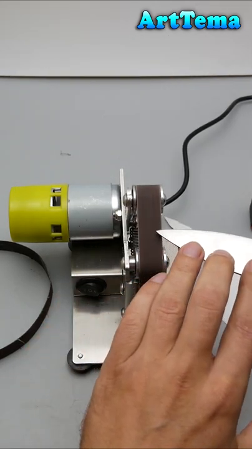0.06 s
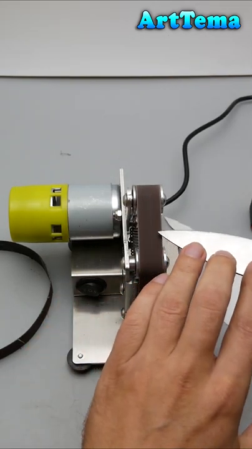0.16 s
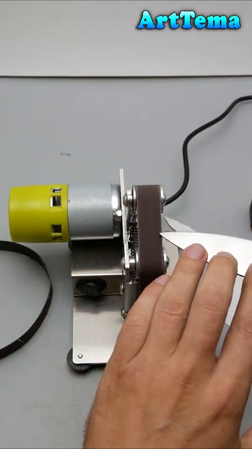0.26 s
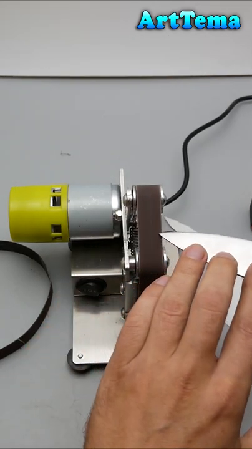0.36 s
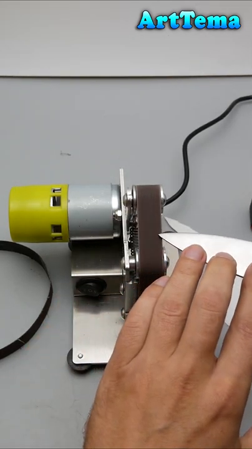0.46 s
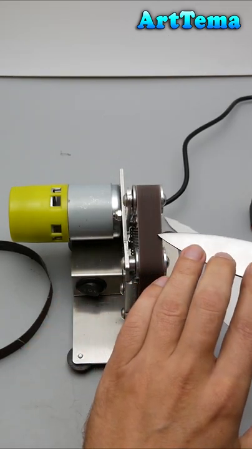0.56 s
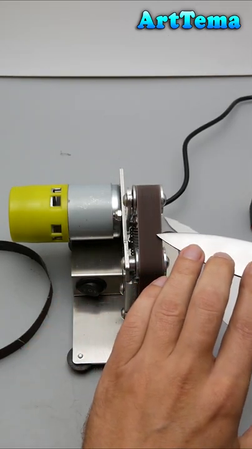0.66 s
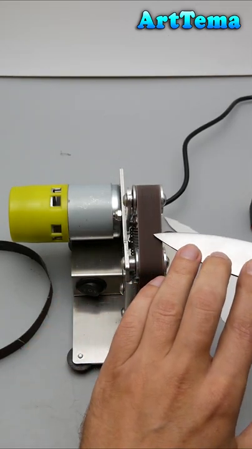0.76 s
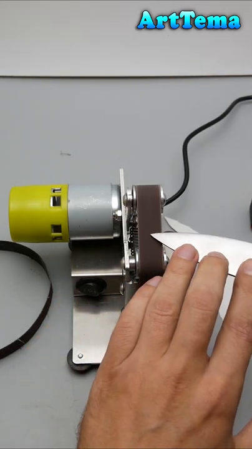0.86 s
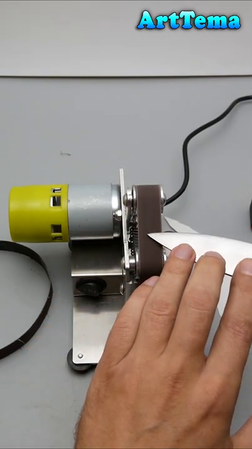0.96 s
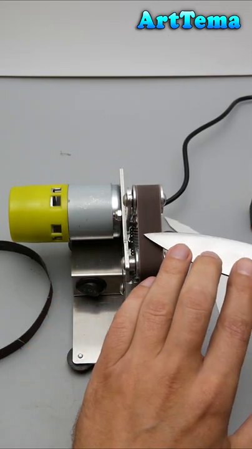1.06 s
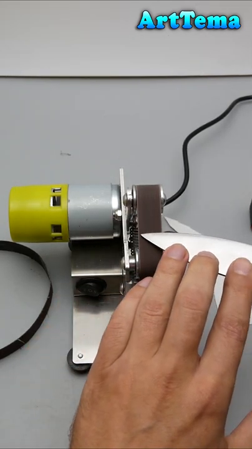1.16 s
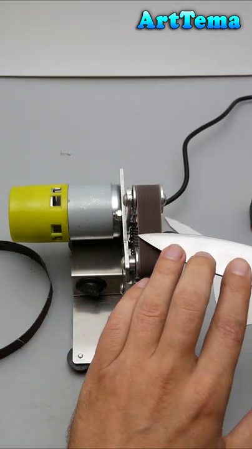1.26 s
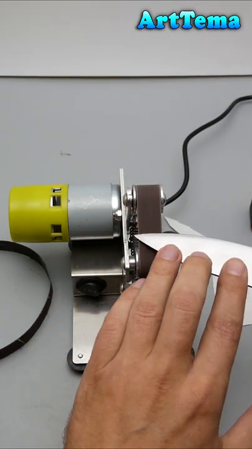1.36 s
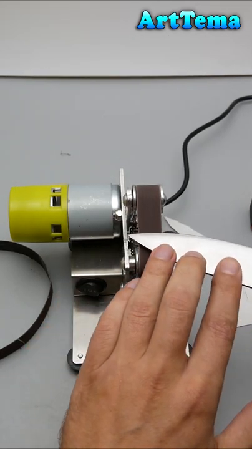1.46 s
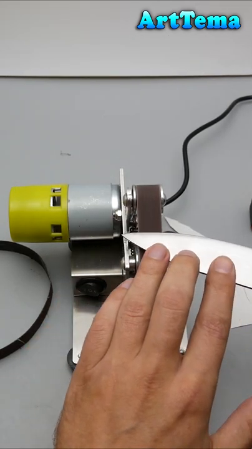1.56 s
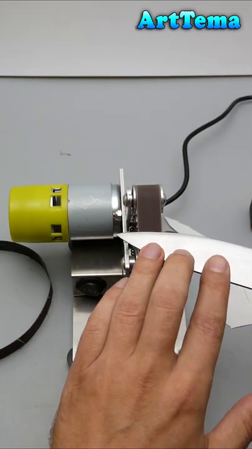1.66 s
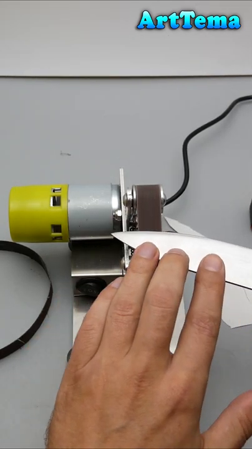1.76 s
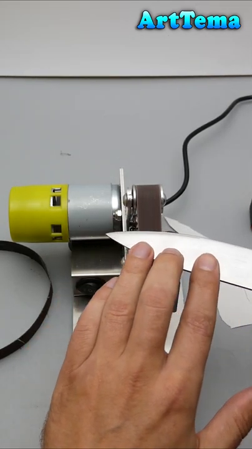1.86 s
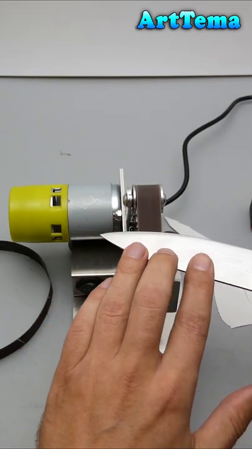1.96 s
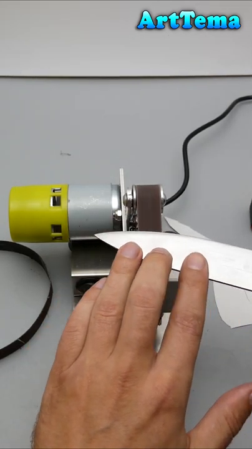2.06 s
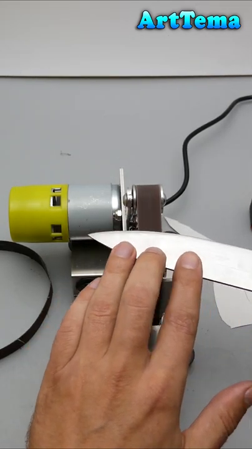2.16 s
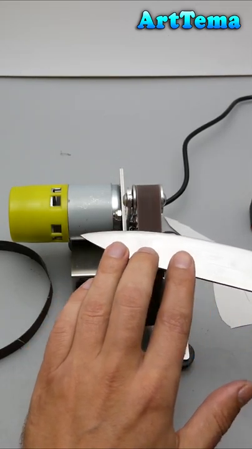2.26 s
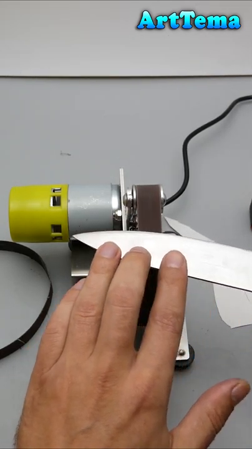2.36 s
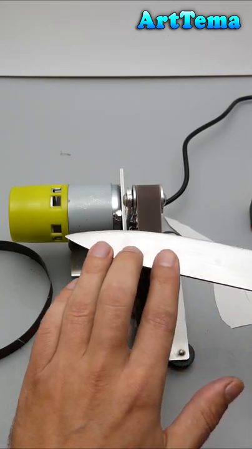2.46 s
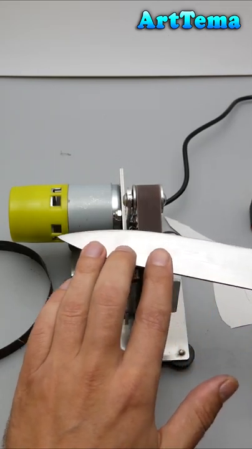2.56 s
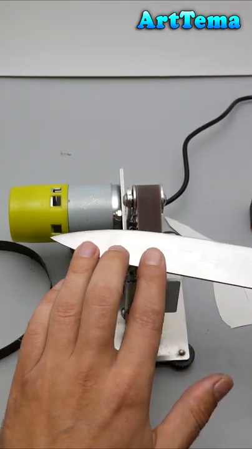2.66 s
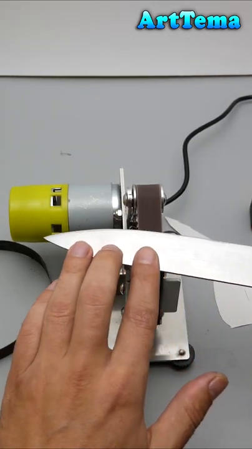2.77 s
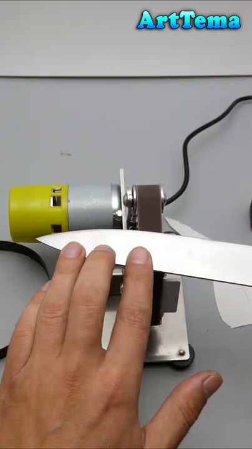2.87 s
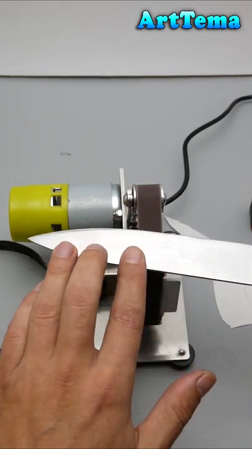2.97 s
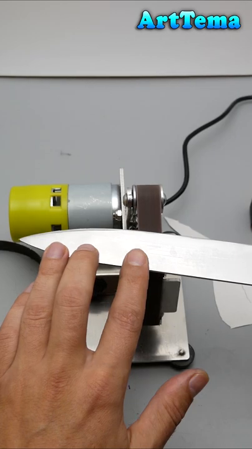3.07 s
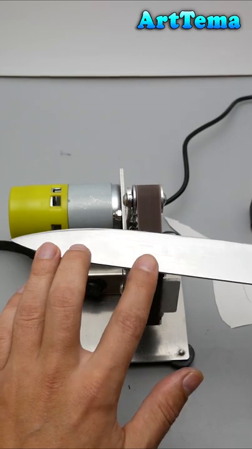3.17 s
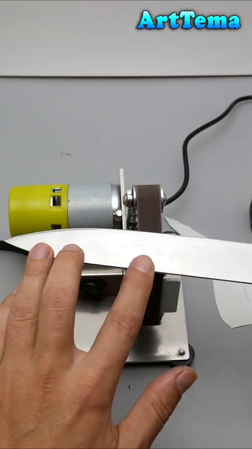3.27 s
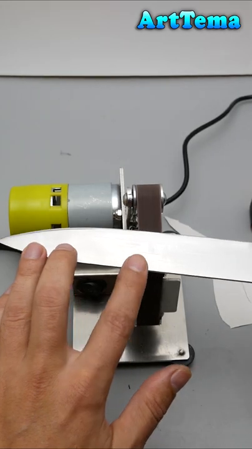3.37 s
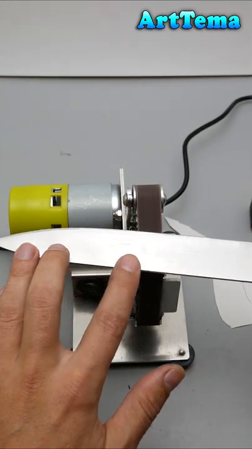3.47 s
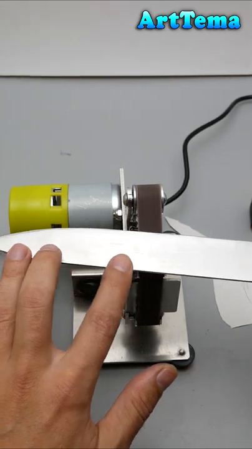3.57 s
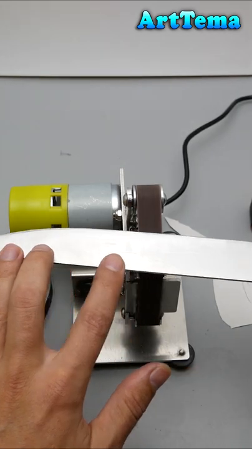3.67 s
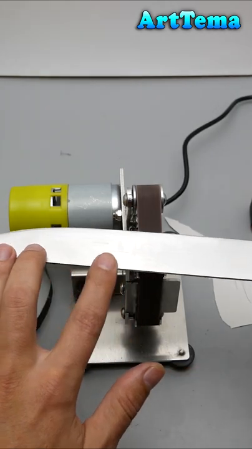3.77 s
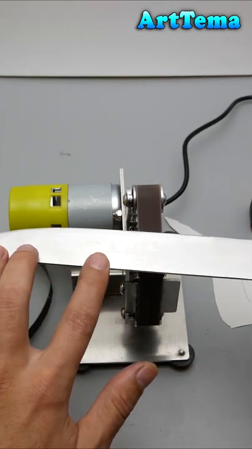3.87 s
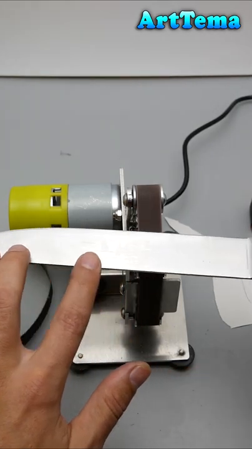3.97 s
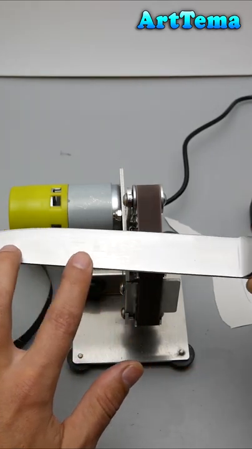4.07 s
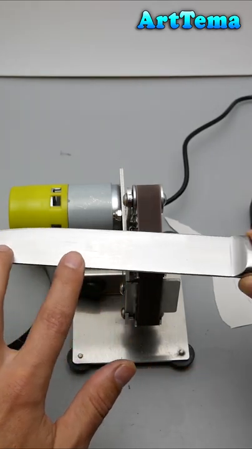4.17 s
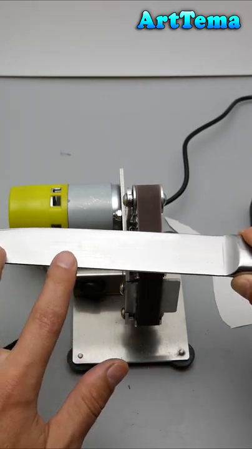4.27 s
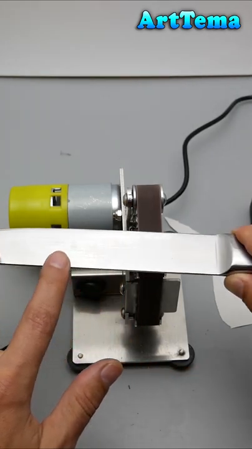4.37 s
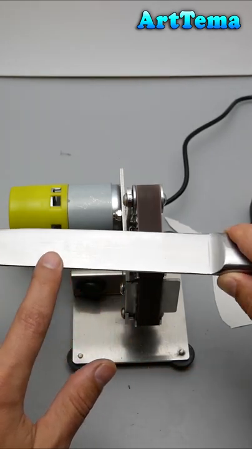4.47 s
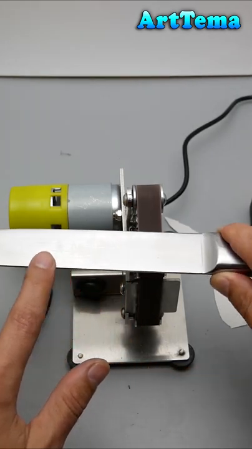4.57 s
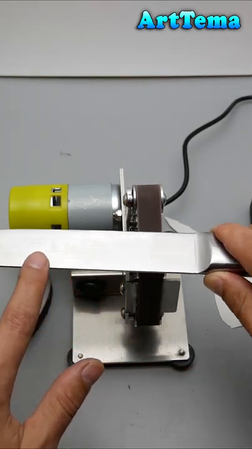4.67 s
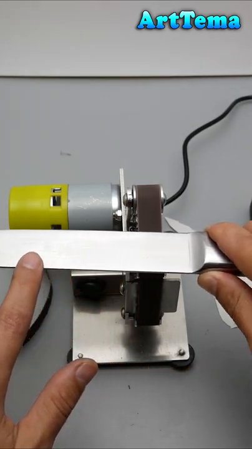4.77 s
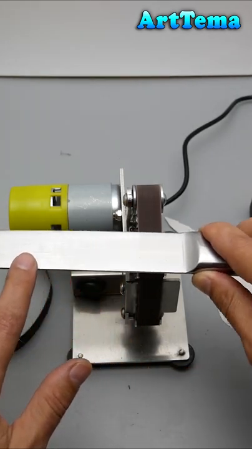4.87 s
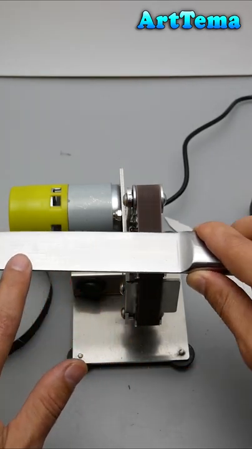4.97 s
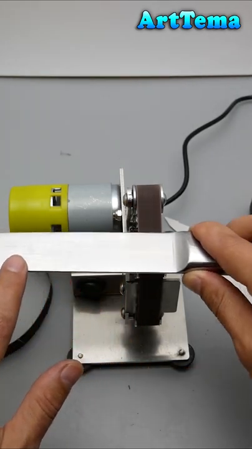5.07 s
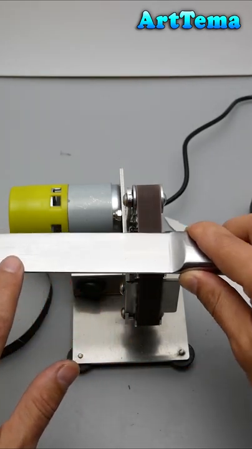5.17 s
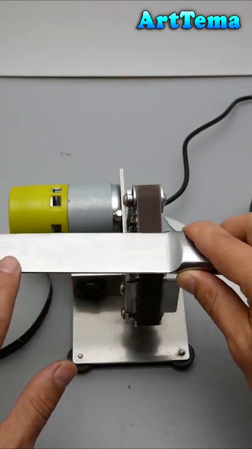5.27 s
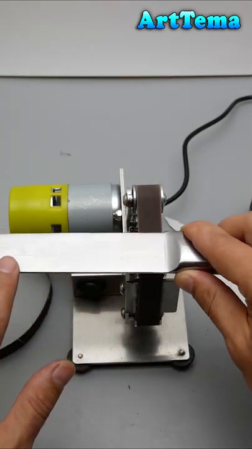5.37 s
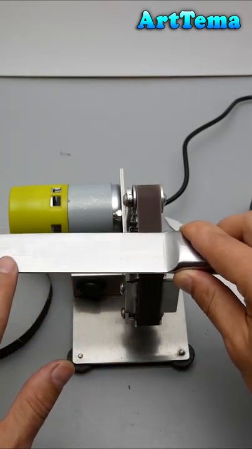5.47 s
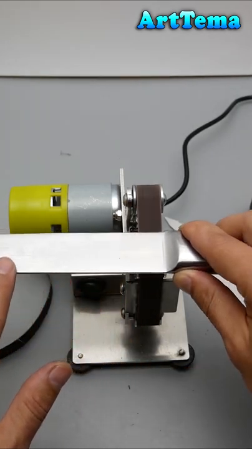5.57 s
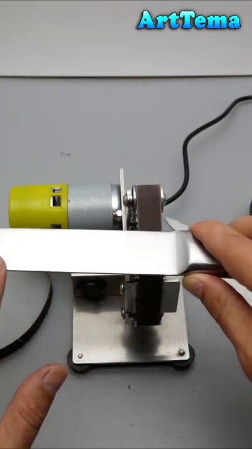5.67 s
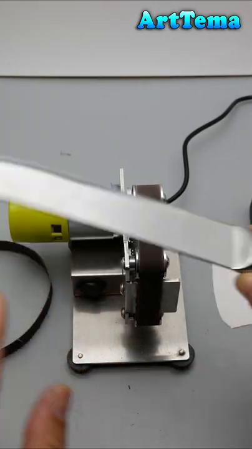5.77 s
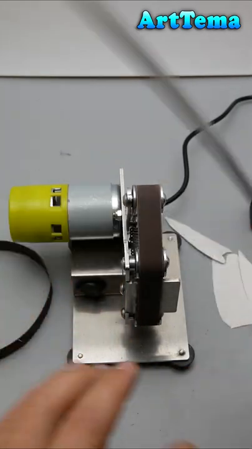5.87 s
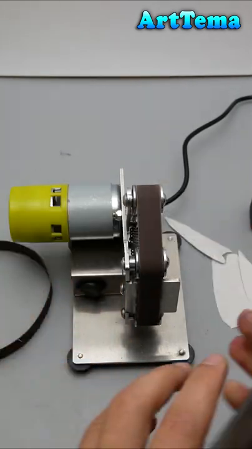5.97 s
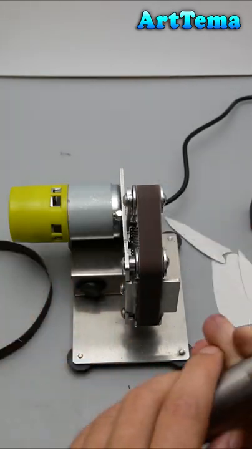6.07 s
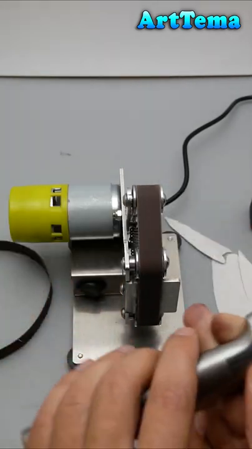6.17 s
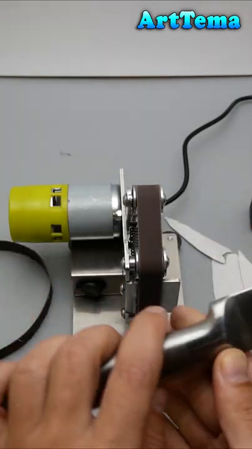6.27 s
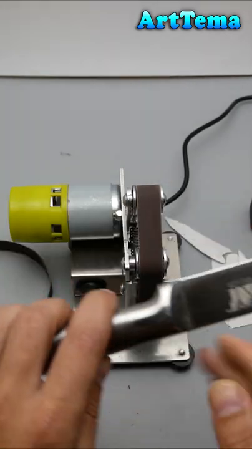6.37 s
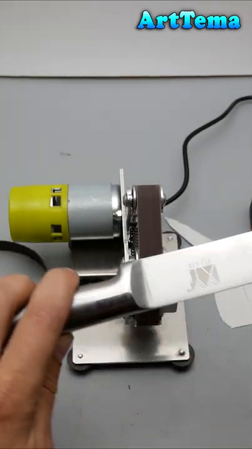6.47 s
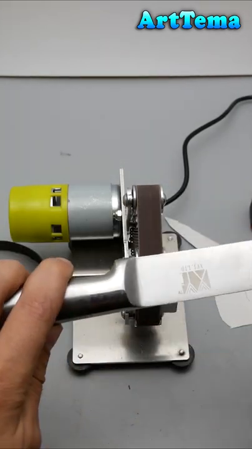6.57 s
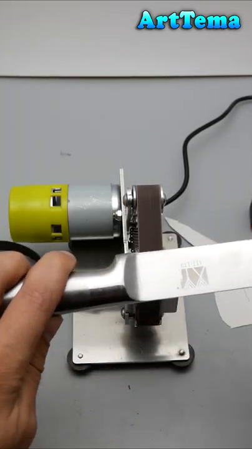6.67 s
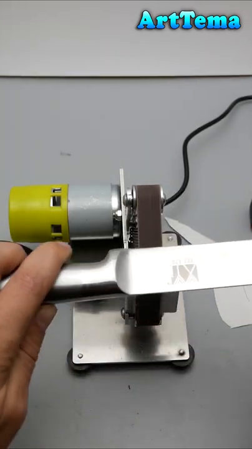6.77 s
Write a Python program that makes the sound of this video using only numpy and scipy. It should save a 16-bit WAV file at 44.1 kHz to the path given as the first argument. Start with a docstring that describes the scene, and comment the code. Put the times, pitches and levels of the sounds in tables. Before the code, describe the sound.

A little belt grinder runs on a desk right by a phone microphone, buzzing and rattling about twenty times a second. A knife grazes it twice, chatters briefly, then grinds in one long gritty stroke with thin metallic ringing. The machine's own noise drops under the blade, then slowly recovers after the knife lifts away. Small room, short desk echoes.

```python
"""On a desk, a small belt grinder runs close to a phone, heard at two microphone ports.
The belt loop brings its rattle and grit back every lap, over tones locked to the lap and the pulleys.
A knife touches twice, then is drawn along the belt from tip to heel: it slows the belt, grit drags on
the edge and rings the blade, and single modes sing out before it lifts off.
Desk echoes and a low room rumble lie around it."""
import sys
import numpy as np
from scipy import signal
from scipy.fft import rfft, irfft, next_fast_len
from scipy.io import wavfile
from scipy.ndimage import uniform_filter1d, map_coordinates

SR = 44100
rng = np.random.default_rng(int(sys.argv[2]) if len(sys.argv) > 2 else 0)


def store_pcm(level_fs):
    """Save levels as 16-bit WAV."""
    pcm = np.round(np.clip(level_fs, -1, 1) * 32767).astype(np.int16)
    wavfile.write(sys.argv[1], SR, np.atleast_2d(pcm).T)


N = 300321

# The stroke along the belt. Each row: time in seconds, grinding level in dB before chatter and belt
# swings, ring of the blade against it in dB.
STROKE = [(0.771, -37.5, -2), (.97, -36.5, 1), (1.5, -36, 2.5), (1.8, -36, 0), (2.05, -35.5, 3.5),
          (2.7, -36, 3), (3.14, -35, 0), (3.62, -36, -1.5), (3.85, -37.5, 2.5), (4.3, -37, 0.5),
          (4.5, -37.5, 2.5), (5.15, -38.5, 0), (5.68, -38, -3)]
STROKE_START, STROKE_END = STROKE[0][0], STROKE[-1][0]  # s
BODY_AT_S = 2.93  # the blade's full width has reached the belt
SETTLE_S, LIFT_S = 0.06, 0.015  # the knife comes to rest on the belt, and leaves it
# First grazes, a lap apart. Each row: middle in seconds, level in dB, length in seconds.
GRAZES = [(0.625, -34.5, 0.02), (0.675, -35, 0.016)]
# The tip chatters as it settles. Each row: time in seconds, boost in dB.
CHATTER = [(.776, 4), (.826, 2.5), (.862, 1.5), (.905, 3.5), (.927, 4), (.956, 2), (.978, 3), (1.014, 1.5)]
CHATTER_S = .006  # half length of one bounce
# Blade modes. Each row: frequency in Hz, width in Hz, level in dB before the stroke's ring level.
BLADE_MODES = [(1028, 31, -21), (1716, 19, -18.5), (3620, 45, -23), (4052, 110, -14.5), (4353, 175, -12.5),
               (4693, 43, -14), (5750, 140, -16.5), (7460, 35, -19), (8700, 31, -18), (9600, 110, -19),
               (10560, 92, -22.5)]
# Grains on steel, spectrum shape. Each row: frequency in Hz, relative level in dB per Hz.
GRIT_SPECTRUM = [(530, -19.5), (900, -8.5), (1580, -1), (1720, -2), (2050, -6.5), (4180, -12.5),
                 (5050, -3.5), (10100, 0), (12600, -7), (14800, -81)]
GRIT_DB = -5.5  # against the grinding level
# Belt thickness round the lap. Each row: multiple of the lap rate, swing in dB, lap position of the top.
BULGES = [(1, 0.7, 0.057), (2, 0.67, 0.37)]
LIGHT_DB, LIGHT_S = 2.5, 0.22  # extra swing while the touch is still light, and its fading time
LIGHT_LAP = .08  # lap position of the high spot that touches first
# Spells when the contact sits on a mode's belly and the blade sings. Each row: middle in seconds,
# length in seconds, frequency in Hz, width in Hz, level in dB against the grinding, throb per lap in dB.
SINGING_SPELLS = [(0.63, 0.19, 4110, 35, -5, 0), (0.6, 0.17, 4710, 45, -6, -1),
                  (0.74, 0.27, 9350, 310, -7, 1), (0.92, 1.3, 4105, 48, -4, 0),
                  (1.07, 0.99, 4270, 55, -10.5, 1), (0.91, 0.31, 4630, 55, -6, 2),
                  (1.02, 0.83, 4810, 80, -5, -2), (1.22, 0.48, 7500, 180, -14, 2),
                  (1.39, 0.96, 11370, 220, -11.5, 3), (1.85, 0.32, 10280, 250, -12.5, -1),
                  (2.16, 0.58, 4315, 57, -9, 2.5), (2.55, 0.92, 4712, 15, -12, 1),
                  (2.8, 1.35, 1744, 12, -11, 1.5), (2.6, 1.25, 1886, 16, -19.5, -2),
                  (0.98, 0.27, 745, 16, -18, 0), (2.79, 0.54, 4115, 49, -9.5, 5),
                  (2.82, .6, 4265, 70, -11.5, 6), (3.96, 0.58, 4230, 53, -8.5, 3),
                  (3.79, 0.44, 4720, 38, -16, 5), (4.04, 2, 7580, 120, -14, 2.5),
                  (4.1, 1.8, 11100, 160, -13, 1.5), (5.3, 1.1, 5670, 40, -18, 1),
                  (5.3, .8, 11050, 90, -10, 5), (5.64, 0.2, 11300, 150, -10, 0),
                  (5.67, 1.36, 4090, 53, -7.5, 4), (5.3, 1, 8700, 80, -21, 7),
                  (5.3, 1.1, 4540, 150, -19.5, -2)]
THROB_HZ, THROB_LAP = (4100, 4300, 4700, 7000), (.46, .35, .43, .2)  # lap position of the loudest singing
SING_HOLD = (.05, .3)  # how far the ringing feeds itself (0-1), at the thin tip and the thick heel
SING_EVEN_S = .025  # time over which the ringing keeps its strength

# Belt speed, pulled down by the knife. Each row: time in seconds, laps per minute.
BELT_SPEED = [(.85, 1176), (1.35, 1163), (2.15, 1152), (2.8, 1149), (3.3, 1138), (4.88, 1133), (5.1, 1123),
              (5.66, 1128), (5.74, 1166), (5.85, 1178)]
# Frame tones before the heard level is applied. Each row: multiple of the lap rate, then the level in
# dB rms running free, with the tip on the belt, and with the blade's body on it.
LAP_TONES = [(6, -65, -61, -63), (7, -57, -55, -50), (14, -71, -57, -59), (15, -45, -44, -47),
             (16, -48, -45, -40), (17, -52, -53, -56), (18, -42, -46, -52), (19, -41, -44, -44),
             (20, -54, -64, -53), (22, -54, -54, -63), (23, -48, -51, -50), (25, -47, -55, -56),
             (26, -51, -57, -54), (27, -50, -63, -62), (28, -46, -68, -65), (29, -38, -52, -54),
             (30, -53, -63, -61), (31, -54, -67, -63), (32, -57, -48, -47), (33, -48, -55, -47),
             (36, -53, -65, -57), (37, -54, -65, -56), (38, -58, -48, -52)]
SPLICE_LAP, SPLICE_SCATTER = .32, .7  # where the belt joint strikes; phase spread (rad, wider under the knife)
# Pulley tones. Each row: pulley turns per lap, multiple of the turns, then the same three levels in dB rms.
PULLEY_TONES = [(4.06, 1, -57, -58, -59), (4.06, 4, -52, -55, -46), (4.06, 30, -52, -56, -58),
                (4.06, 8, -61, -67, -61), (5.43, 1, -60, -63, -62)]
AFTER_DB = -0.7  # these tones come back a little softer once the knife is off
# Frame and pulley modes. Each row: frequency in Hz, width in Hz, relative level in dB per Hz of width.
FRAME_MODES = [(1112, 26, 3), (1390, 50, -3), (1757, 39, 5), (1900, 99, -1.5), (2370, 90, -3),
               (3100, 65, -2), (3665, 26, 3.5), (3870, 41, -0.5), (5880, 130, -8), (9900, 850, -11.5)]
FRAME_DB, PRESSED_DB = -37.5, -3.5  # modes running free; the pressed knife damps them
RATTLE_DB, RATTLE_LAP = 4, .65  # the modes swell once a lap: swing, lap position of the top
KNOCK_LAPS, KNOCK_HZ, KNOCK_WIDTH_HZ = (.48, .65), 1750, 70  # the joint knocks on one ringing part
KNOCK_DB = (-50, -58, -44)  # that ring before the stroke, under the knife and after it
# Belt running on the pulleys, spectrum shape. Each row: frequency in Hz, relative level in dB per Hz.
WHIRR_SPECTRUM = [(25, -69), (60, -19.5), (200, -25.5), (300, -9), (600, -16), (860, -17), (1100, -11),
                  (2000, -11), (3710, -10), (10200, -23), (13400, -37), (14800, -96)]
WHIRR_DB = -31.5
# Level at which the grinder is heard: falls from just before the first graze, sinks on from BODY_AT_S,
# climbs after the lift.
FALL_AT_S, FALL_DB, FALL_S, SINK_DB_PER_S, CLIMB_DB_PER_S = .56, -12.5, 0.24, -2, 6
BASS_HZ, BASS_FALL_DB = 170, -14  # the bass below BASS_HZ is heard to drop no further than this

# Level difference of the microphone ports. Each row: frequency in Hz, left minus right in dB.
PORT_LEVEL = [(60, 4.5), (370, 5), (690, 2.5), (1260, -2), (2320, -1.5), (4260, -.4), (14400, -.4)]
# Phase difference of the ports. Each row: frequency in Hz, radians by which the left leads.
PORT_PHASE = [(100, -.3), (950, -.6), (1900, 0), (14000, 0)]
# Echoes in the side signal. Each row: frequency in Hz, level in dB.
SIDE_ECHOES = [(60, -13), (150, -9), (350, -12), (700, -13), (1300, -9.5), (2300, -9), (4300, -16),
               (8000, -15), (14000, -13)]
ROOM_T60_S = .6
RUMBLE_DB = -70  # low room rumble, unrelated at the two ports
TOP_HZ = 14100  # the phone's upper limit


def knife(lap):
    """Grit drags on the edge and rings the blade; single modes swell as the contact slides along."""
    t = np.arange(N) / SR
    ring_db = over_time(STROKE)[1]
    swing_db = belt_swing_db(lap, t)
    pulley_db = 0.65 * np.cos(2 * np.pi * PULLEY_TONES[0][0] * lap)
    drag = surface(lap, memory=0.911, fresh=0.042, fine_hz=7440) * undb(swing_db + pulley_db)
    sound = level(colour(drag, undb(over_hz(GRIT_SPECTRUM))), GRIT_DB)
    for hz, width, db in BLADE_MODES:
        sound += undb(db + ring_db + walk(2.1)) * ring(drag, hz, width)
    for middle, length, hz, width, db, throb_db in SINGING_SPELLS:
        span = slice(max(int((middle - length) * SR), 0), int((middle + length) * SR))
        throb = np.cos(2 * np.pi * (lap[span] - np.interp(hz, THROB_HZ, THROB_LAP)))
        swell = np.exp(-4 * ((t[span] - middle) / length) ** 2)
        along = (middle - STROKE_START) / (STROKE_END - STROKE_START)
        gain = undb(db + throb_db * throb + swing_db[span])
        sound[span] += gain * swell * sing(drag[span], hz, width, along)
    return contact(t) * sound


def contact(t):
    """Strength of the grinding: two grazes, then the stroke with the tip bouncing at its start."""
    press = undb(over_time(STROKE)[0]) * np.clip((t - STROKE_START) / 0.0031, 0, 1)
    press *= np.exp(-np.clip(t - STROKE_END, 0, 1) / 0.011)
    for middle, db, length in GRAZES:
        press += undb(db) * np.exp(-((t - middle) / (length / 2)) ** 4)
    return press * undb(sum(db * np.exp(-((t - at) / CHATTER_S) ** 2) for at, db in CHATTER))


def belt_swing_db(lap, t):
    """Thicker belt grinds louder every lap; the high spot counts for more around the light first touch."""
    swing = sum(db * np.cos(2 * np.pi * k * (lap - top)) for k, db, top in BULGES)
    light = LIGHT_DB * np.exp(-np.abs(t - STROKE_START) / LIGHT_S)
    return swing + light * np.cos(2 * np.pi * (lap - LIGHT_LAP))


def sing(drag, hz, width, along):
    """A rough ring of steady strength, smoother towards the heel where stick-slip evens out its swing."""
    size = next_fast_len(len(drag))
    off = (np.arange(size // 2 + 1) * SR / size - hz) / width
    # positive frequencies only: the magnitude is the ring's envelope
    swing = np.fft.ifft(rfft(drag, size) / (1 + off ** 2) ** 1.5, size)[:len(drag)]
    swing /= uniform_filter1d(np.abs(swing), int(SING_EVEN_S * SR))
    hold = np.interp(along, (0, 1), SING_HOLD)
    return level(swing.real / (np.abs(swing) + 0.063) ** hold, 0)


def seating():
    """How the knife sits: 0 off the belt, 1 tip, sliding to 2 body."""
    return over_time([(STROKE_START, 0), (STROKE_START + SETTLE_S, 1), (BODY_AT_S, 2),
                      (STROKE_END, 2), (STROKE_END + LIFT_S, 0)])[0]


def grinder(lap):
    """Tones, knocks, frame modes and whirr of the running belt, at the level at which they are heard."""
    seat = seating()
    after = np.arange(N) > STROKE_END * SR
    tones = (lap_tones(lap, seat) + pulley_tones(lap, seat)) * undb(AFTER_DB * after)
    belt = surface(lap, memory=0.98, fresh=0.16, fine_hz=4000)
    whirr = level(colour(belt, undb(over_hz(WHIRR_SPECTRUM))), WHIRR_DB)
    machine = np.sqrt(2) * tones + joint_knocks(lap, seat, after) + frame_modes(belt, lap, seat) + whirr
    bass = colour(machine, np.arange(N // 2 + 1) * SR / N < BASS_HZ)
    heard_db = heard_level_db()
    return (machine - bass) * undb(heard_db) + bass * undb(np.maximum(heard_db, BASS_FALL_DB))


def lap_tones(lap, seat):
    """The joint shakes the frame at multiples of the lap; the knife damps some tones and wakes others."""
    order, free_db = np.transpose(LAP_TONES)[:2]
    # minimum phase: each strike starts sharply and rings out
    log_gain = np.interp(np.abs(np.arange(-64, 64)), order, free_db) * np.log(10) / 20
    lag = -np.imag(signal.hilbert(log_gain))[64:]
    spread = SPLICE_SCATTER + np.minimum(seat, 1)
    tones = 0
    for k, *db in LAP_TONES:
        angle = 2 * np.pi * k * (lap - SPLICE_LAP) + lag[int(k)] + spread * rng.standard_normal()
        tones += np.interp(seat, range(3), undb(db)) * undb(walk(4.5)) * np.sin(angle)
    return tones


def pulley_tones(lap, seat):
    """Pulleys hum at multiples of their own turning, geared to the belt."""
    tones = 0
    for turns, k, *db in PULLEY_TONES:
        angle = 2 * np.pi * (k * turns * lap + rng.random())
        tones += np.interp(seat, range(3), undb(db)) * np.sin(angle)
    return tones


def joint_knocks(lap, seat, after):
    """The belt joint knocks twice a lap on one part, which rings through two resonances in turn."""
    knocks = sum(np.exp(-((lap - at) % 1 * 600 - 3) ** 2) for at in KNOCK_LAPS)
    knock = ring(ring(knocks, KNOCK_HZ, KNOCK_WIDTH_HZ), KNOCK_HZ, 4 * KNOCK_WIDTH_HZ)
    return knock * undb(np.where(after, KNOCK_DB[2], np.interp(seat, (0, 1), KNOCK_DB[:2])))


def frame_modes(belt, lap, seat):
    """Belt grain rattles the frame and pulley modes, more at one part of the lap; the knife damps them."""
    rattle = belt * undb(RATTLE_DB * np.cos(2 * np.pi * (lap - RATTLE_LAP)))
    modes = sum(undb(db) * np.sqrt(width) * ring(rattle, hz, width) for hz, width, db in FRAME_MODES)
    return level(modes, FRAME_DB) * undb(PRESSED_DB * np.minimum(seat, 1))


def heard_level_db():
    """Level at which the grinder is heard: a quick fall, a slow sink until the lift, a steady climb."""
    t = np.arange(N) / SR
    fall = FALL_DB * (1 - np.exp(-np.clip(t - FALL_AT_S, 0, None) / FALL_S))
    sink = SINK_DB_PER_S * np.clip(t - BODY_AT_S, 0, STROKE_END - BODY_AT_S)
    return fall + sink + CLIMB_DB_PER_S * np.clip(t - STROKE_END, 0, None)


def surface(lap, memory, fresh, fine_hz):
    """Belt grain that returns each lap and wears slowly; above fine_hz more of it is new."""
    grains = rng.standard_normal((int(lap[-1]) + 2, 2304))  # laps by grains round the belt
    kept = min(memory, .99)
    grains[0] /= np.sqrt(1 - kept ** 2)
    grains = signal.lfilter([1], [1, -kept], grains, axis=0).ravel()
    old = level(map_coordinates(grains, [lap * 2304], order=3), 0)
    hz = np.arange(N // 2 + 1) * SR / N
    share = np.clip(fresh + (1 - fresh) * 0.3 / (1 + (fine_hz / (hz + 1)) ** 4), 0, 1)
    return colour(old, np.sqrt(1 - share)) + colour(rng.standard_normal(N), np.sqrt(share))


def at_ports(mid):
    """Two ports differ in level and phase; decaying noise adds desk echoes of opposite sign to each."""
    ratio = undb(over_hz(PORT_LEVEL)) * np.exp(1j * over_hz(PORT_PHASE))
    t = np.arange(SR // 2) / SR
    tail = rng.standard_normal(len(t)) * np.exp(-np.log(1000) * t / ROOM_T60_S)
    echoes = rfft(tail / np.sqrt(np.sum(tail ** 2)), N) * undb(over_hz(SIDE_ECHOES))
    side = colour(mid, (ratio - 1) / (ratio + 1) + echoes)
    return np.array([mid + side, mid - side])


def room_rumble():
    """Low broad noise, drawn separately for each port."""
    return [undb(RUMBLE_DB) * ring(rng.standard_normal(N), 120, 150) for port in range(2)]


def undb(db):
    """dB to gain."""
    return 10 ** (np.asarray(db) / 20)


def level(x, db):
    """Set the rms."""
    return x * undb(db) / np.sqrt(np.mean(x ** 2))


def over_time(table):
    """Columns of a curve at every sample."""
    s, *columns = np.transpose(table)
    return [np.interp(np.arange(N) / SR, s, c) for c in columns]


def over_hz(table):
    """A spectrum at every bin, straight lines over log frequency."""
    hz, value = np.transpose(table)
    return np.interp(np.log(np.arange(1, N // 2 + 2) * SR / N), np.log(hz), value)


def colour(x, gain):
    """Filter by a gain for each bin."""
    return irfft(rfft(x) * gain, N)


def ring(x, hz, width):
    """One mode, rms 1."""
    return level(signal.lfilter(*signal.iirpeak(hz, hz / width, SR), x), 0)


def walk(rate):
    """Slow chance wandering, rms 1."""
    k = int(SR / rate)
    return level(uniform_filter1d(uniform_filter1d(rng.standard_normal(N), k), k), 0)


def scene():
    """Knife and grinder share one belt; both reach the two ports over the room rumble."""
    lap = np.cumsum(over_time(BELT_SPEED)[0]) / 60 / SR  # laps run so far
    return at_ports(knife(lap) + grinder(lap)) + room_rumble()


def record(dry):
    """The phone has a narrow notch in the treble and cuts the top."""
    notched = signal.lfilter(*signal.iirnotch(7870, 60, SR), dry)
    return signal.sosfilt(signal.ellip(8, .2, 70, TOP_HZ, fs=SR, output="sos"), notched)


dry = scene()
out = record(dry)
store_pcm(out)
```